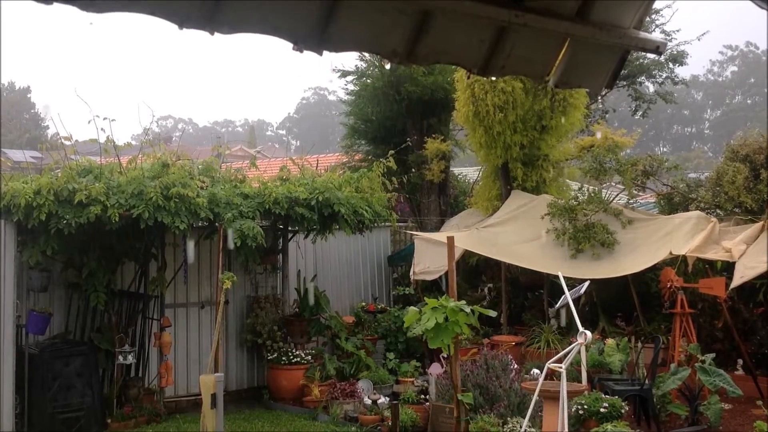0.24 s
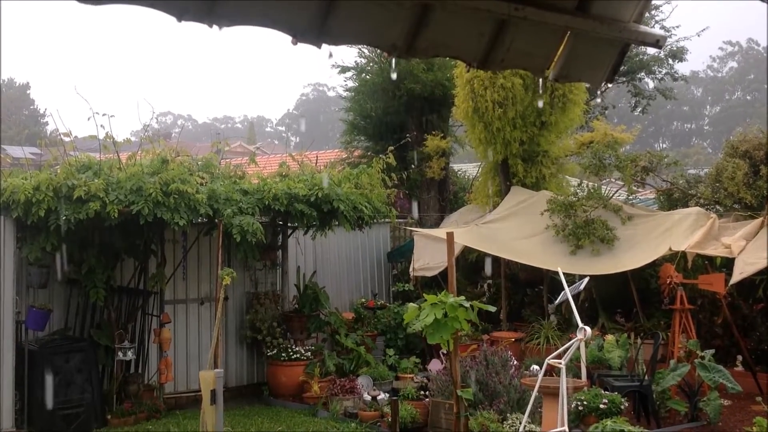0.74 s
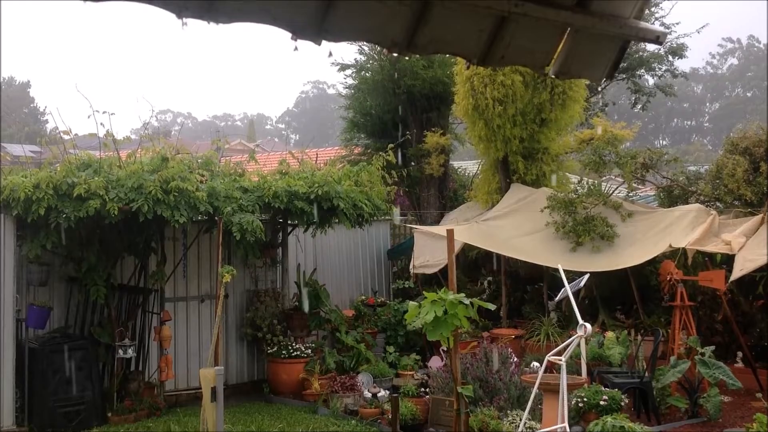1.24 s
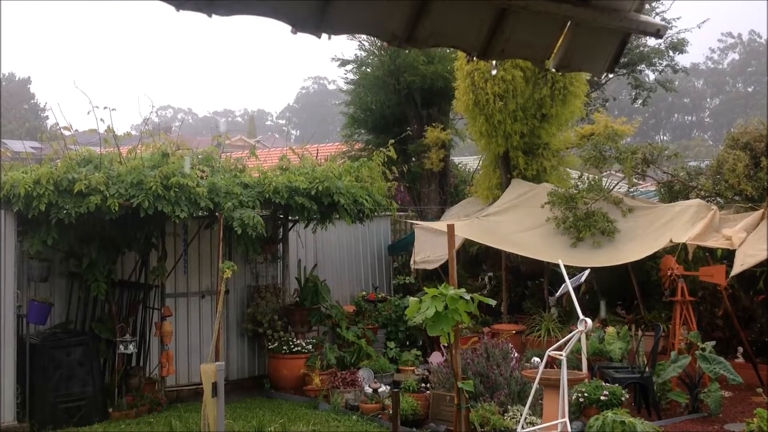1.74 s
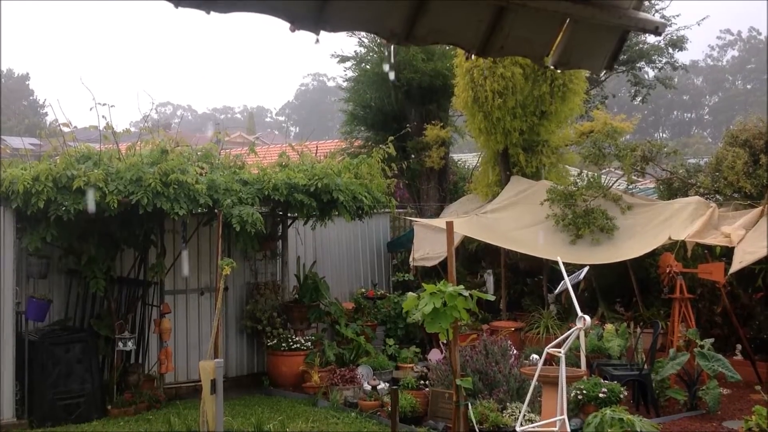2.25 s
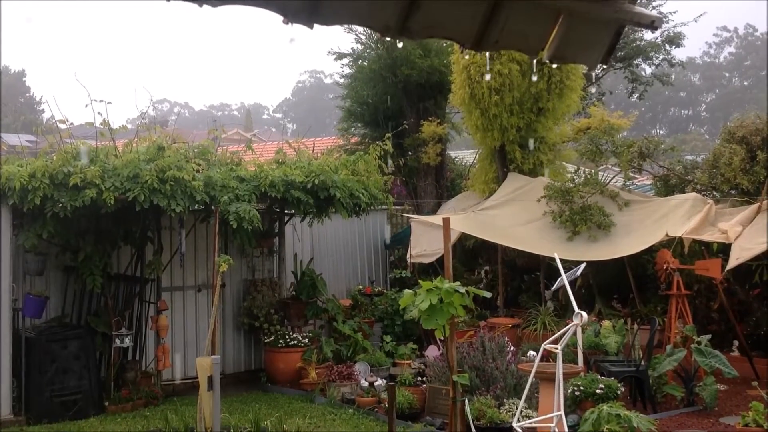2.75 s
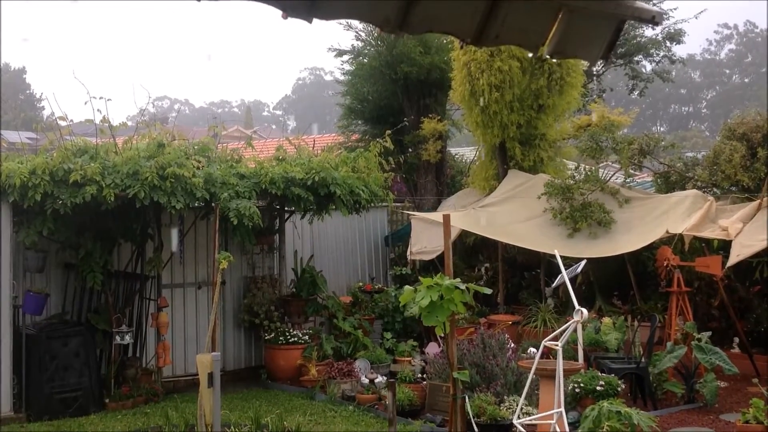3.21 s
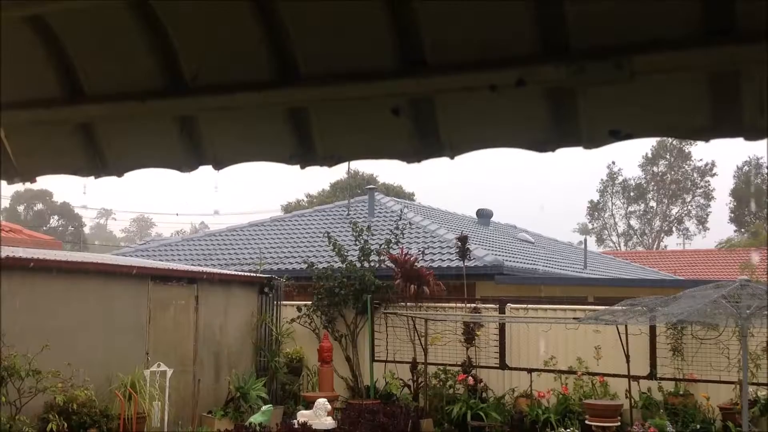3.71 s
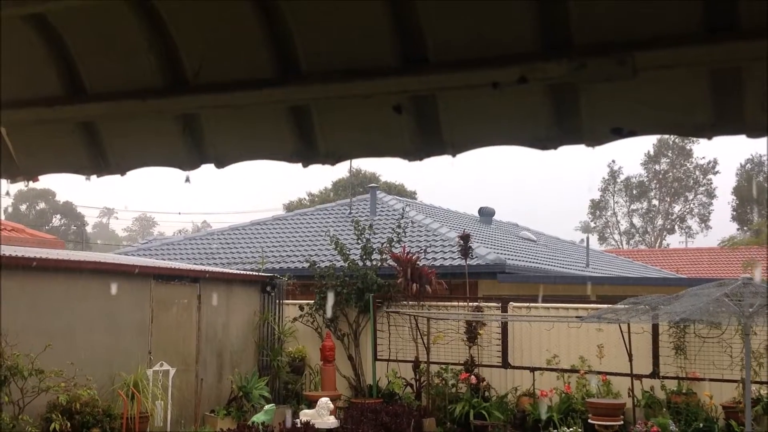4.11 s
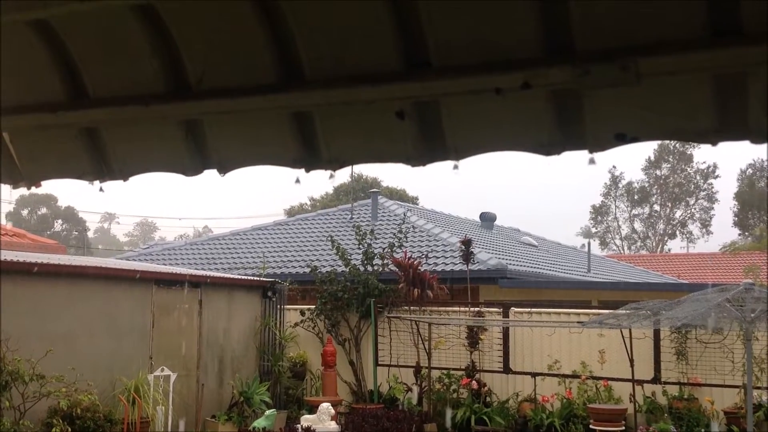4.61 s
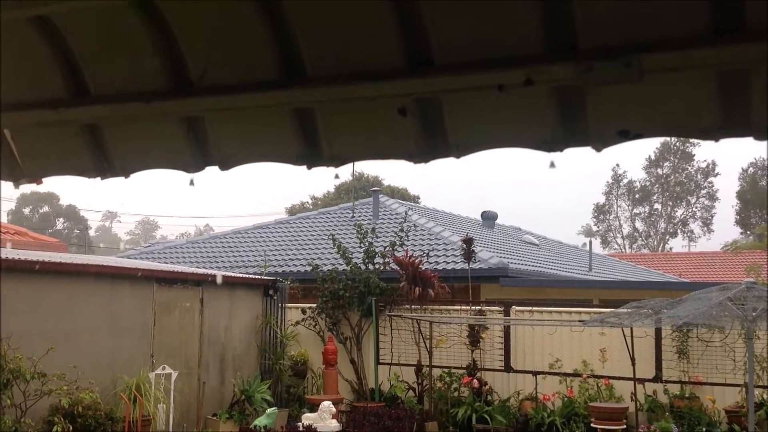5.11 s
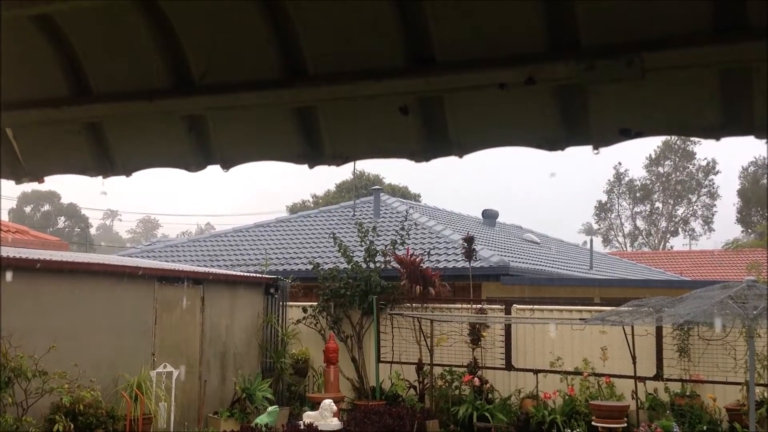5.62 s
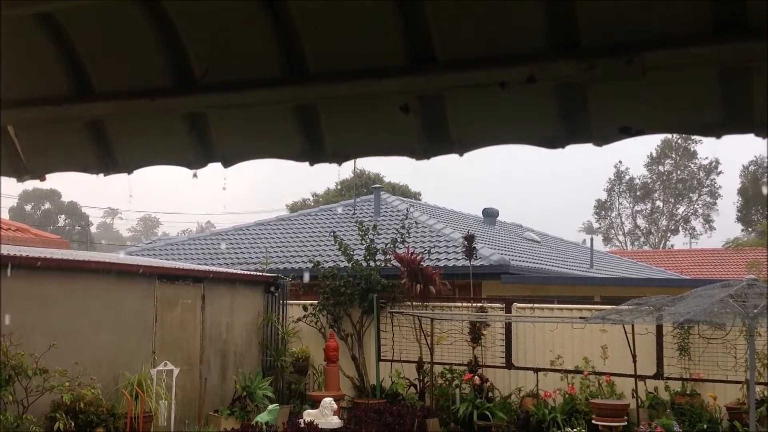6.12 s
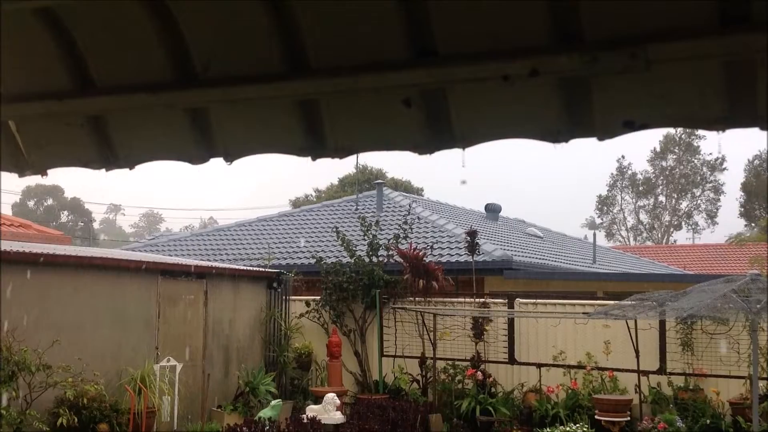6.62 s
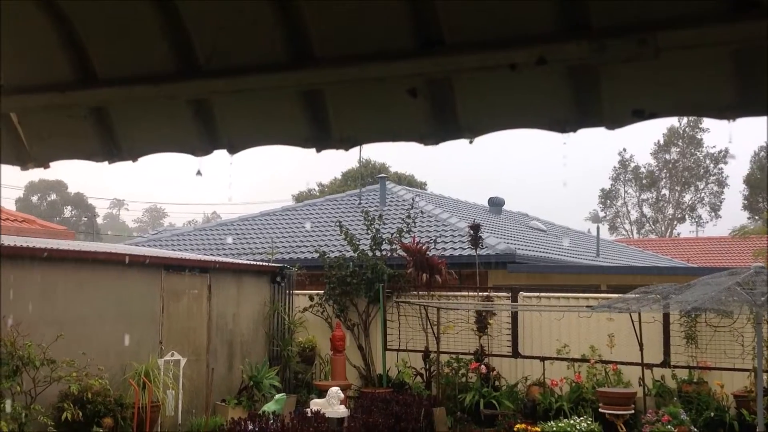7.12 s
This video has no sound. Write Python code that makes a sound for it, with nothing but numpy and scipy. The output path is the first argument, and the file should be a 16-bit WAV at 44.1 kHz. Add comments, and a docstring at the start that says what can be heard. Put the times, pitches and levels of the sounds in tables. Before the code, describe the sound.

Steady downpour heard from under a metal awning, sharp drips nearby, then a tiny gap and a denser, louder rain on a roof.

```python
"""Heavy rain under a metal awning

Mono: the rain is heard first facing a garden, then, after a very short silence, facing a roof, where it is louder.
Filtered noise makes the wash of countless drops; random clicks ring the roofing as patter and tick on leaves.
Drips from the eave splash close by as short noise bursts. A few soft gusts, made of low noise, bump
the microphone at first, over a light breeze. The treble dips briefly now and then."""
import sys
import numpy as np
from scipy import signal
from scipy.fft import rfft, irfft, next_fast_len
from scipy.io import wavfile
from scipy.ndimage import uniform_filter1d

SR = 44100
rng = np.random.default_rng(int(sys.argv[2]) if len(sys.argv) > 2 else 0)


def wav_out(sig):
    """Save sig, one row per channel (or a flat mono array), as 16-bit PCM at SR to the path in sys.argv[1]."""
    wavfile.write(sys.argv[1], SR, np.round(np.clip(np.atleast_2d(sig).T, -1, 1) * 32767).astype(np.int16))


N = 324135
TIME = np.arange(N) / SR
# the garden side ends where the silence begins, and the roof side starts where it ends
SILENCE_FROM_S, SILENCE_TO_S = 3.770, 3.811


# colour of the patter and wash on the garden side, overall level set later: pitch_hz, relative_level_db
GARDEN_DRUM_COLOUR = [(94, -34.5), (160, -13.5), (176, -8.5), (313, -1), (360, -2.5), (391, -3), (665, -6),
                      (891, -4.5), (1130, -4), (1250, -2.5), (4500, -15), (5850, -19.5), (9900, -120)]
# colour of the hiss on the garden side, overall level set later: pitch_hz, relative_level_db
GARDEN_SPRAY_COLOUR = [(1760, -38.5), (3000, -8.5), (4280, -4.5), (6140, -3), (7430, -4.5), (13500, -5.5),
                       (15300, -5)]


def garden_side(start_drum_db=-33, start_spray_db=-38, rise_db_per_s=0.51):
    """Rain on foliage and shade cloth slowly thickens, sparse enough for single splashes to be heard."""
    drum = from_db(start_drum_db) * drumming(GARDEN_DRUM_COLOUR, per_s=1800)
    hiss = from_db(1.5) * spray(GARDEN_SPRAY_COLOUR, per_s=2500, spread_db=1.5, tick_db=-7.0)
    splashes = from_db(-4.5) * small_splashes(per_s=70)
    rain = drum + from_db(start_spray_db) * (hiss + splashes)
    return from_db(rise_db_per_s * TIME) * rain


# colour of the patter and wash on the roof side, overall level set later: pitch_hz, relative_level_db
ROOF_DRUM_COLOUR = [(94, -43.5), (160, -12.5), (184, -7), (335, 2), (396, -2.5), (547, 0), (629, -3),
                    (1410, 0), (2060, -3), (2880, -6.5), (4500, -9.5), (5850, -12), (9900, -120)]
# colour of the hiss on the roof side, overall level set later: pitch_hz, relative_level_db
ROOF_SPRAY_COLOUR = [(1760, -39), (3000, -5.5), (3910, -7.5), (6140, -3.5), (7790, -7), (12700, -6.5),
                     (15300, -6.5)]


def roof_side():
    """Dense rain on tiles and metal sheet swells as a heavier shower arrives."""
    elapsed_s = TIME - SILENCE_TO_S
    shower = step(6.49, onset_s=0.26)
    # each level: as it comes in, its rise per second, and what the shower adds
    drum_db = -27.5 + 0.25 * elapsed_s + 2 * shower
    spray_db = -35.5 + 0.86 * elapsed_s + 1.8 * shower
    # so many drops fall at once that few stand out
    drum = from_db(drum_db) * drumming(ROOF_DRUM_COLOUR, per_s=3000)
    hiss = from_db(4.0) * spray(ROOF_SPRAY_COLOUR, per_s=7300, spread_db=0.0, tick_db=-7)
    splashes = from_db(-4.0) * small_splashes(per_s=160)
    return drum + from_db(spray_db) * (hiss + splashes)


def drumming(colour, per_s, patter_db=-11, spread_db=2.7, cycles=14, flurry_db=2.2, spots=24):
    """Drops in flurries ring the roofing, each at the pitch of its spot, over the wash of distant rain."""
    hits = drops(per_s, spread_db) * from_db(flurry_db * flurries(per_s=14))
    spot_of_hit = rng.integers(0, spots, N)
    patter = np.zeros(N)
    for spot, hz in enumerate(np.geomspace(600, 3600, spots)):
        # a click makes little sound at a low pitch, more at a high one
        patter += hz * ring(hits * (spot_of_hit == spot), hz, cycles / hz)
    wash = rng.standard_normal(N)
    return under_awning(coloured(wash + from_db(patter_db) * rms_one(patter), colour))


# resonances and hollows of the awning and its gutter: pitch_hz, width_hz, change_db
AWNING_RESONANCES = [(174, 29, 3.5), (345, 75, -0.5), (665, 270, -1), (1240, 220, 0), (2000, 690, 2.5),
                     (2890, 300, -1.5), (3100, 350, 2)]


def under_awning(x):
    """Each resonance of the awning lifts or hollows a narrow band; they act one after another."""
    for hz, width_hz, db in AWNING_RESONANCES:
        band = signal.lfilter(*signal.iirpeak(hz, hz / width_hz, fs=SR), x)
        x = x + (from_db(db) - 1) * band
    return x


def spray(colour, per_s, spread_db, tick_db):
    """Fine ticks of drops on leaves and paving stand out of a smooth far hiss."""
    far_hiss = rng.standard_normal(N)
    ticks = rms_one(drops(per_s, spread_db))
    return coloured(far_hiss + from_db(tick_db) * ticks, colour)


def small_splashes(per_s, spread_db=9, splat_t60_s=0.006, spray_db=-9):
    """Larger drops from leaves and gutters burst at random, a few metres away; rms 1."""
    out = np.zeros(N)
    for when, size, surface in rng.random((int(per_s * N / SR), 3)):
        hz = 4500 + 10000 * surface
        # the square makes large drops rarer
        add(out, when * N / SR, from_db(spread_db * size ** 2) * splash(hz, splat_t60_s, spray_db))
    return rms_one(out)


# drips from the eave: start_s, level_db, surface_pitch_hz, spray_db (relative to the splat)
EAVE_DRIPS = [(0.111, -16, 9000, -20), (0.511, -22, 9500, -6), (0.931, -22, 11500, -3),
              (1.031, -20, 12000, -13), (1.123, -16.5, 8200, -6), (1.483, -15, 9600, -10),
              (1.542, -15, 13000, -13), (2.012, -20, 9000, -7), (2.060, -18.5, 6000, -12),
              (2.2266, -10, 4330, -10), (2.402, -21, 7000, -3), (2.561, -20, 12500, -6),
              (2.7188, -5, 3240, -12.5), (2.8976, -3.5, 11300, -17), (2.984, -18.5, 9000, -10),
              (3.481, -18, 11000, -7), (4.394, -12.5, 7800, -20), (4.818, -9, 6000, -12.5),
              (7.009, -14, 8100, -12)]


def eave_drips():
    """Heavy drips fall from the awning close by: each taps the surface and bursts an instant later."""
    splat_t60_s, tap_t60_s, burst_after_s = 0.0054, 0.0024, 0.0026
    tap_db, tap_spray_db = -4.5, -30
    overtone_ratio, overtone_db = 1.74, -3.5
    out = np.zeros(N)
    for s, db, hz, spray_db in EAVE_DRIPS:
        tap = splash(hz, tap_t60_s, tap_spray_db)
        overtone = splash(overtone_ratio * hz, splat_t60_s, spray_db)
        burst = splash(hz, splat_t60_s, spray_db) + from_db(overtone_db) * overtone
        # the surface hardly rings below a share of its pitch
        burst = butter(burst, 0.65 * hz, "high")
        add(out, s, from_db(db + tap_db) * tap)
        add(out, s + burst_after_s, from_db(db) * burst)
    return out


def splash(hz, splat_t60_s, spray_db, spray_t60_s=0.14, ring_width=0.1, ring_db=9, crack=2.7, low_cut=0.47):
    """A drop cracks and bursts in a short splat, then its droplets fall back as a fading spray; peak 1."""
    t = np.arange(SR // 10) / SR
    splat = from_db(-60 * t / splat_t60_s)
    fading_spray = from_db(spray_db - 60 * t / spray_t60_s)
    burst = rng.standard_normal(len(t)) * np.hypot(splat, fading_spray) + crack * (t == 0)
    # the surface that it hits rings in one region of the treble
    surface = signal.lfilter(*signal.iirpeak(min(hz, .4 * SR), 1 / ring_width, fs=SR), burst)
    sound = from_db(ring_db) * surface + butter(burst, max(low_cut * hz, 2600), "high")
    return sound / np.abs(sound).max()


# gusts on the microphone: crest_s, level_db (rms at the crest), width_s
MICROPHONE_GUSTS = [(0.048, -30.5, 0.011), (0.096, -29, 0.0076), (0.133, -25.5, 0.021),
                    (0.298, -30, 0.0072), (0.33, -31.5, 0.0079), (1.095, -36, 0.0085), (1.85, -41.5, 0.015),
                    (2.88, -41, 0.024), (3.425, -36, 0.02)]


def gusts(strongest_hz=185, fall_hz_per_db=3.0):
    """Puffs of air rumble on the microphone; a stronger puff rumbles higher."""
    strongest_db = max(db for _, db, _ in MICROPHONE_GUSTS)
    out = np.zeros(N)
    for s, db, width_s in MICROPHONE_GUSTS:
        hz = strongest_hz - fall_hz_per_db * (strongest_db - db)
        out += from_db(db) * bell(s, width_s) * rumble(hz)
    return out


def breeze(hz=150, change_s=0.08):
    """Moving air rumbles on the garden side, with one lull; on the roof side it stays calm."""
    early_db, lull_db, late_db = -51.5, -61.5, -53
    early = 1 - step(1.92, change_s)
    late = step(3.3, change_s) * (TIME < SILENCE_FROM_S)
    db = lull_db + (early_db - lull_db) * early + (late_db - lull_db) * late
    return from_db(db) * rumble(hz, width=1.5, even_s=0.18)


def rumble(hz, width=1.24, even_s=0.0195):
    """Low turbulence is noise around a pitch, with its level held near 1."""
    noise = butter(rng.standard_normal(N), [hz / width, hz * width], "band")
    noise = butter(noise, 0.5 * hz, "high")
    return noise / np.sqrt(uniform_filter1d(noise ** 2, int(even_s * SR)) + 1e-12)


def drops(per_s, spread_db):
    """Impacts fall at random moments: many small, few large."""
    sizes = from_db(spread_db * np.minimum(rng.exponential(1, N), 5))
    return (rng.random(N) < per_s / SR) * sizes * rng.choice([-1, 1], N)


def ring(clicks, hz, t60_s):
    """A unit click sets a sine ringing from a height of 1, fading by 60 dB in t60_s."""
    r, w = from_db(-60 / (t60_s * SR)), 2 * np.pi * hz / SR
    return signal.lfilter([0, np.sin(w)], [1, -2 * r * np.cos(w), r * r], clicks + 1e-18)


def flurries(per_s):
    """A random swell, in straight lines between new values so many times a second; spread about 1."""
    return np.interp(TIME * per_s, np.arange(512), rng.standard_normal(512))


def coloured(x, colour):
    """Give a white signal a colour, at minimum phase so that nothing sounds early; rms 1."""
    size = 2 * next_fast_len(N // 2 + 4096)
    hz, db = np.transpose(colour)
    grid_hz = np.maximum(np.arange(size // 2 + 1) * SR / size, 1)
    gain = from_db(np.interp(np.log(grid_hz), np.log(hz), db))
    # keeping one half of the cepstrum, doubled, gives the minimum-phase filter
    cepstrum = irfft(np.log(gain))
    response = np.exp(rfft(2 * cepstrum[:size // 2], size))
    return rms_one(irfft(rfft(x, size) * response)[:N])


def butter(x, hz, kind, order=2):
    """Causal Butterworth filter."""
    return signal.sosfilt(signal.butter(order, np.clip(hz, 10, .45 * SR), kind, fs=SR, output="sos"), x + 1e-18)


def bell(s, width_s):
    """A smooth rise and fall of height 1 around a moment."""
    return np.exp(-.5 * ((TIME - s) / width_s) ** 2)


def step(s, onset_s):
    """A smooth change from 0 to 1 around a moment."""
    return .5 + .5 * np.tanh((TIME - s) / onset_s)


def from_db(db):
    """Decibels to gain."""
    return 10 ** (np.asarray(db) / 20)


def rms_one(x):
    """Scale to an rms of 1."""
    return x / np.sqrt(np.mean(x ** 2) + 1e-20)


def add(track, s, sound):
    """Mix a sound into a track at a time."""
    start = int(np.clip(round(s * SR), 0, N - 1))
    track[start:start + len(sound)] += sound[:N - start]


def scene():
    """One side of the house, then the other; both channels are the same."""
    rain = np.where(TIME < SILENCE_FROM_S, garden_side(), roof_side())
    return np.tile(rain + eave_drips() + gusts() + breeze(), (2, 1))


# moments when the treble dips briefly: centre_s
TREBLE_DIPS = [0.127, 2.791, 3.559, 4.882, 5.265, 5.649, 5.778, 5.969, 6.993, 7.143]


def record(dry, dip_db=15.5, dip_width_s=0.0049, dip_above_hz=2400, low_share=0.11, fade_out_s=0.009):
    """The treble dips now and then, the sound stops briefly between the two sides, and the top is cut."""
    depth_db = dip_db * sum(bell(s, dip_width_s) for s in TREBLE_DIPS)
    lows = signal.sosfiltfilt(signal.butter(4, dip_above_hz, fs=SR, output="sos"), dry)
    treble = dry - lows
    # the lows dip too, by a small share of the depth
    sound = lows * from_db(-low_share * depth_db) + treble * from_db(-depth_db)
    fade_out = np.clip((SILENCE_FROM_S - TIME) / fade_out_s, 0, 1) ** 2
    running = fade_out + (TIME > SILENCE_TO_S)
    # steep cut above 15300 Hz
    return signal.sosfilt(signal.ellip(14, .1, 80, 15300, fs=SR, output="sos"), sound * running)


dry = scene()
out = record(dry)
wav_out(out)
```